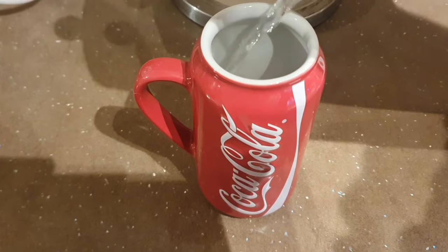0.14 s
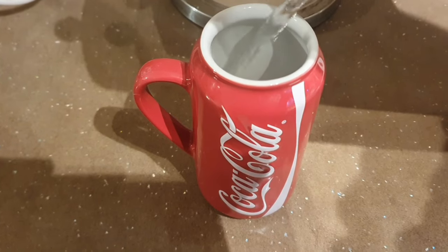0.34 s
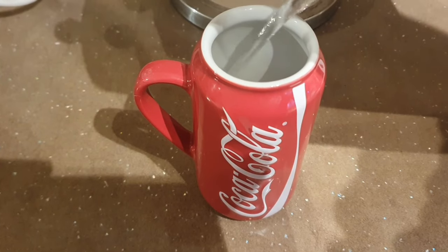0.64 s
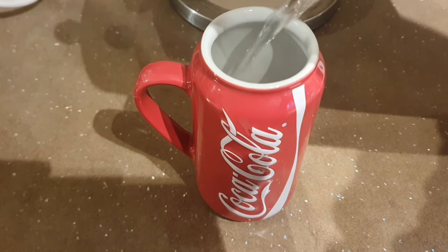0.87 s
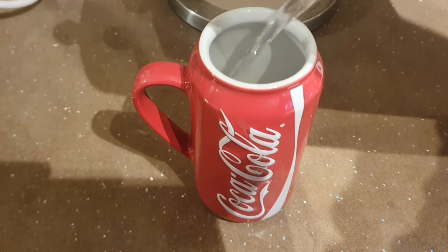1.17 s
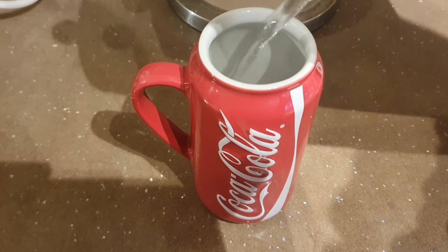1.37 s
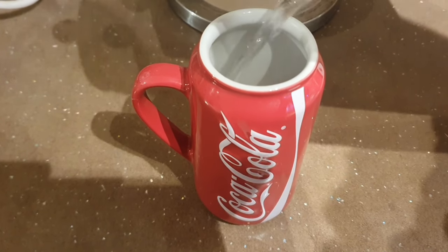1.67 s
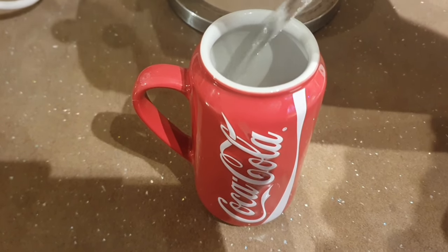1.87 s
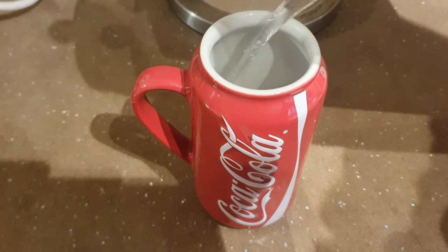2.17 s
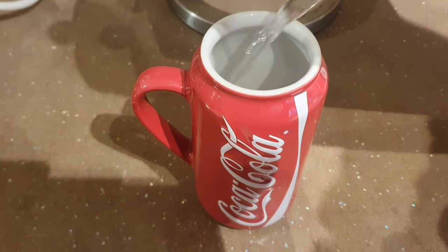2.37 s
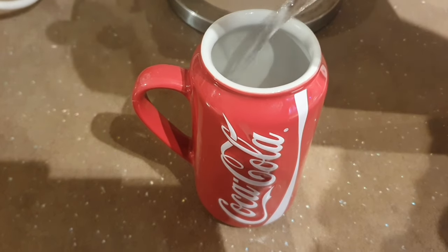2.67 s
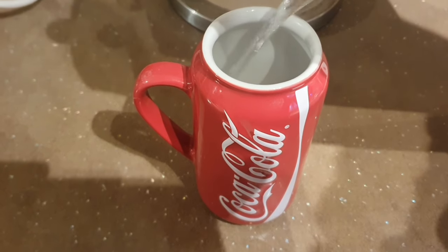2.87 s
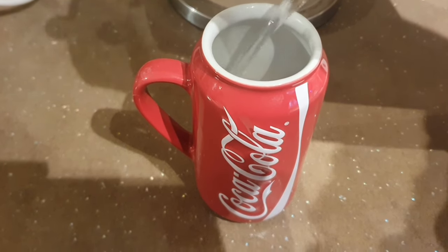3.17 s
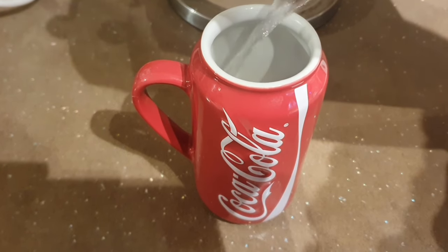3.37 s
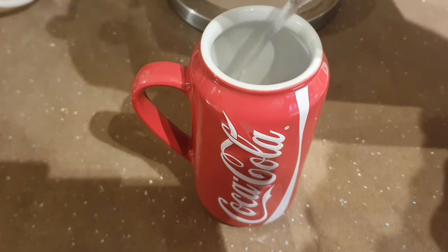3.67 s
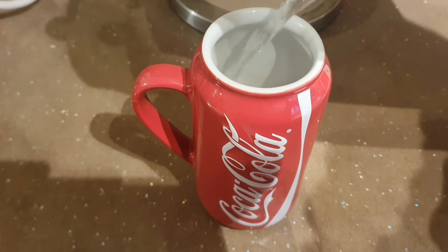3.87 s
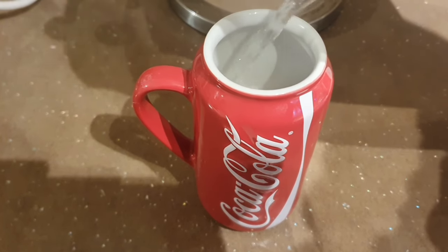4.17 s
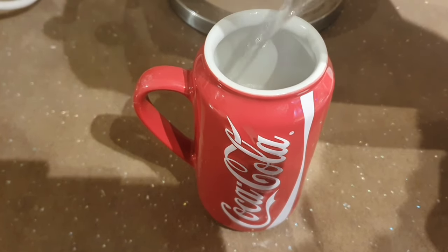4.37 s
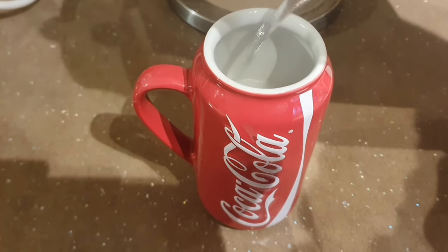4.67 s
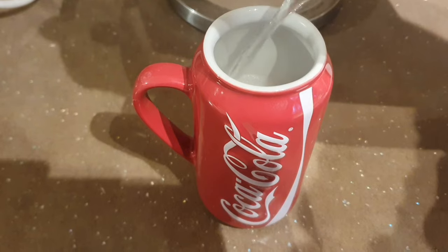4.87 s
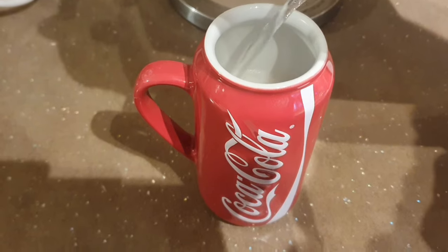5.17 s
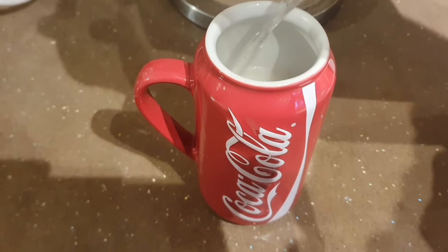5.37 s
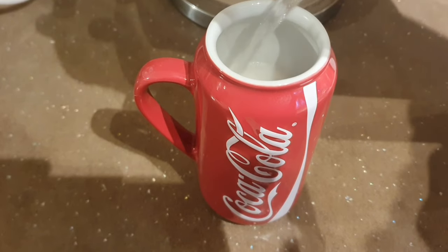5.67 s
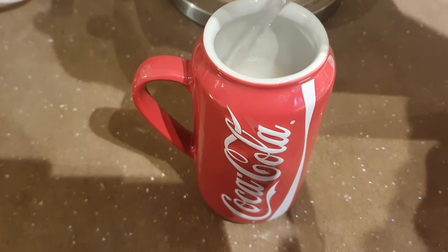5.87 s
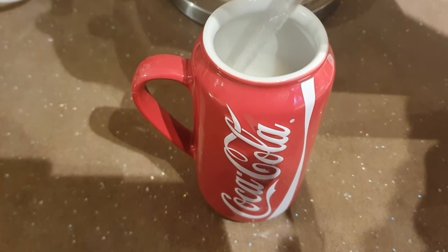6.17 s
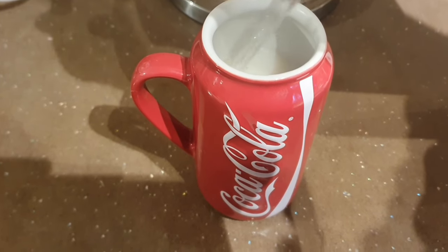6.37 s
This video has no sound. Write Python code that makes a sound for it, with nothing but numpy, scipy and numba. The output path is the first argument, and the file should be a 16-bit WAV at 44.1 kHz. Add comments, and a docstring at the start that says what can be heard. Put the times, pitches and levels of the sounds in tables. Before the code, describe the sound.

A thin stream of hot water pours into a tall ceramic mug without stopping. Bubbles plop and ring hollowly, with sharp ticks and small splats of droplets on glaze. The pouring eases in the middle, then grows dense and bubbly while the hollow pitch climbs. A close phone microphone in a small kitchen catches short echoes, low steady hum and soft air noise.

```python
"""A stream of hot water gurgles, plops and ticks into a tall ceramic mug, over a steady motor hum.
The water traps bubbles, each a short dying tone; they ring the air column above the water,
and its pitch climbs as the mug fills. Droplets add noisy ticks and splats on glaze and water.
A phone hears it from close by in a small kitchen, with short echoes, appliance and mains hum,
and soft air noise."""
import sys
import numpy as np
from scipy import signal
from scipy.fft import rfft, irfft
from scipy.io import wavfile
from numba import njit

SR = 44100
rng = np.random.default_rng(int(sys.argv[2]) if len(sys.argv) > 2 else 0)


def wav_record(signal):
    """Record a signal, one row per channel, as 16-bit PCM in the file named by sys.argv[1]."""
    frames = np.transpose(np.atleast_2d(signal))
    bounded = np.clip(frames, -1, 1)
    # unit amplitude maps onto the largest positive 16-bit level
    quanta = np.round(bounded * 32767).astype(np.int16)
    wavfile.write(sys.argv[1], SR, quanta)


N = 287973


def undb(db):
    """Turn decibels into a gain."""
    return 10 ** (np.asarray(db) / 20)


def unit(x):
    """Scale a sound to an rms (average strength) of 1."""
    return x / np.sqrt(np.mean(x ** 2))


def curves(table):
    """Draw each column of a timed table as a line, sample by sample."""
    s, *columns = np.transpose(table)
    return [np.interp(np.arange(N) / SR, s, column) for column in columns]


def pan(db):
    """Left and right gains for a level difference, left minus right."""
    return undb(np.array([[db], [-db]]) / 2)


def add(out, s, sound):
    """Mix a short sound in at time s, in seconds."""
    i = min(max(int(s * SR), 0), N)
    out[..., i:i + sound.shape[-1]] += sound[..., :N - i]


def convolve(x, response):
    """Filter one or two channels with a response."""
    return signal.fftconvolve(np.atleast_2d(x), np.atleast_2d(response), axes=1)[:, :N]


def high_pass(x, order, hz):
    """Take away what lies below a pitch."""
    return signal.sosfilt(signal.butter(order, hz, "high", fs=SR, output="sos"), x)


def colour(x, points, size=1024):
    """Shape the spectrum through (pitch_hz, level_db) points, by a filter of unit energy."""
    hz, db = np.transpose(points)
    grid = np.maximum(np.arange(size // 2 + 1) * SR / size, 1)
    level_db = np.interp(np.log(grid), np.log(hz), db)
    # folding the cepstrum makes the filter respond only after its input
    cepstrum = irfft(np.log(undb(level_db)))
    cepstrum[1:size // 2] *= 2
    cepstrum[size // 2 + 1:] = 0
    response = irfft(np.exp(rfft(cepstrum)))
    return convolve(x, response / np.linalg.norm(response))


def walk(rate):
    """Wander at random between normal draws, with this many new draws per second."""
    knots = rng.standard_normal(N // 100)
    return np.interp(np.arange(N) / SR * rate, np.arange(len(knots)), knots)


def fade(t60, size):
    """Die away by 60 dB in t60 seconds."""
    return np.exp(-np.log(1000) * np.arange(size) / SR / t60)


def burst(t60, size=2048):
    """Dying noise with unit energy in each of two channels."""
    x = rng.standard_normal((2, size)) * fade(t60, size)
    return x / np.linalg.norm(x, axis=1, keepdims=True)


@njit
def resonate(x, hz, width):
    """Band-pass with a moving centre and width, both in Hz; gain 1 at the centre."""
    y, band, low = np.empty(len(x)), 0., 0.
    for i in range(len(x)):
        g, k = np.tan(np.pi * hz[i] / SR), width[i] / hz[i]
        v = (band + g * (x[i] - low)) / (1 + g * (g + k))
        band, low, y[i] = 2 * v - band, low + 2 * g * v, k * v
    return y


def bubble(hz, cycles, rise=0.066, size=2048):
    """A sine that dies within some cycles, its pitch rising as the bubble nears the surface."""
    age = np.arange(size) * hz / SR  # in cycles
    phase = age * (1 + rise * np.minimum(age / cycles, 1))
    return np.sin(2 * np.pi * phase) * fade(cycles / hz, size)


def patter(spread_db, count):
    """Random impacts of rms 1: many weak ones, a few strong."""
    when, size, sign = rng.random((count, 3)).T
    out = np.zeros(N)
    strength = undb(-spread_db * np.log(size + .015))
    np.add.at(out, (when * N).astype(int), np.sign(sign - .5) * strength)
    return unit(out)


# Air noise of the kitchen, shape of its spectrum: pitch_hz, level_db (relative, per Hz)
AIR_COLOUR = [(20, -9), (45, -6.5), (80, 4.5), (120, 9), (215, -5), (340, 2), (480, -9.5), (700, -9.5),
              (1000, -17.5), (2000, -20.5), (4000, -29.5), (7000, -39), (15000, -41.5)]


def air():
    """Steady room noise, alike left and right in the bass and louder on the right."""
    mid, side = colour(rng.standard_normal((2, N)), AIR_COLOUR, size=8192)
    side = high_pass(side, 1, 650)
    return undb(-46.5) * (mid + side * np.array([[1], [-1]])) * pan(-6.0)


# Steady tones of motor and mains: pitch_hz, level_db (rms, before wavering and panning)
HUM_TONES = [(50, -47), (100, -31.5), (120, -64), (150, -65.5), (160.1, -46.5), (200, -48.5), (250, -58.5),
             (300, -55), (320.2, -47.5), (350, -69), (400, -55.5), (450, -66.5), (500, -60), (550, -74),
             (640.4, -69.5)]
# Standing waves in the room place each tone: left_minus_right_db, left_lead_rad
HUM_PLACES = [(-1.5, -.13), (-3.2, -.43), (-3, -.5), (-3, -.7), (-2.4, -.84), (-5.9, -1.18), (-2.7, -.49),
              (-4.2, -.23), (-3.4, -.42), (-3, -.6), (-2.5, -.93), (-3, -.9), (-7, -2.4), (-3, -.9),
              (-3, -.9)]


def hum():
    """Mains and motor hum as a stack of sines; the upper ones waver more."""
    t, out = np.arange(N) / SR, 0
    for (hz, db), (pan_db, lead) in zip(HUM_TONES, HUM_PLACES):
        phase = 2 * np.pi * (hz * t + rng.random()) + 0.00007 * hz * walk(2.4)
        ports = np.array([[lead], [-lead]]) / 2
        level = np.sqrt(2) * undb(db + 0.00058 * hz * walk(1.5))  # root 2 turns rms into peak
        out = out + level * pan(pan_db) * np.sin(phase + ports)
    return out


def kitchen(x):
    """Early reflections from worktop and kettle, then a short dull tail, stronger on the right."""
    early = undb(-7.5) * burst(0.018, size=16384)
    tail = undb(-9.0) * burst(0.15, size=16384)
    lag = int(.004 * SR)  # 4 ms before the first reflection
    wet = convolve(x, np.pad(early + tail, ((0, 0), (lag, 0))))
    return signal.sosfilt(signal.butter(2, 6500, fs=SR, output="sos"), wet) * pan(-2.5)


def microphones(x):
    """Sound reaches the left port first; treble scattered by the rim arrives in opposite phase."""
    direct = np.array([x, np.roll(x, 3)])  # right port 3 samples later
    treble = high_pass(x, 2, 2600)
    # noise with every pitch made equally strong, then faded
    spectrum = rfft(burst(0.018)[0])
    scatter = irfft(spectrum / np.abs(spectrum)) * fade(0.11, size=2048)
    return direct * pan(0.32) + undb(-10.5) * convolve(treble, scatter) * np.array([[1], [-1]])


def surface_echo(x, column_hz, share=0.15):
    """Ticks bounce once, upside down, between rim and water; the echo comes sooner as the mug fills."""
    n = np.arange(N)
    lag = SR / (2 * column_hz + 250)  # in samples
    return x - share * np.array([np.interp(n - lag, n, channel) for channel in x])


def tick(hz):
    """A sharp crack, a tiny bubble's ping and a rattle of reflections between the mug's walls."""
    ping = bubble(hz, cycles=210)
    return burst(0.00046) + undb(-7.0) * ping / np.linalg.norm(ping) + undb(1) * burst(0.03)


# The sharpest droplets: start_s, tick_level_db, splat_level_db (both before the gains below),
# ping_hz (start pitch)
DROPLETS = [(0.0517, -35, -58, 11400), (0.0897, -31.5, -47, 11500), (0.1186, -22, -47, 10300),
            (0.1456, -16, -45.5, 11900), (0.343, -30.5, -76, 10000), (0.367, -38, -58, 13500),
            (0.4, -31.5, -50.5, 10100), (0.425, -43, -45.5, 8500), (0.4412, -37, -45.5, 8650),
            (0.4756, -25, -49, 9500), (0.502, -30, -54, 11300), (0.545, -25.5, -67, 10300),
            (0.5638, -29, -49, 10200), (0.576, -23.5, -52.5, 10200), (0.69, -32, -71, 13500),
            (0.863, -35, -56, 11000), (0.9134, -20.5, -52, 11700), (0.9724, -31, -57, 13000),
            (1.0242, -29, -63, 12100), (1.1765, -19, -50, 10100), (1.192, -39, -60, 11000),
            (1.382, -29.5, -72, 8260), (1.418, -35, -50, 10300), (1.507, -35, -61, 11600),
            (1.666, -40, -48.5, 9330), (1.6904, -28, -48, 13000), (1.7092, -36, -46, 9900),
            (1.733, -39, -59, 11000), (1.8313, -31.5, -76, 9500), (1.9, -38, -53, 11900),
            (2.0677, -33, -53, 11700), (2.2433, -38.5, -44.5, 8100), (2.263, -52, -52, 9000),
            (2.5726, -33, -51, 11700), (3.053, -34.5, -67, 9900), (3.124, -38, -50, 10900),
            (3.1468, -31, -61, 10000), (3.197, -27, -77, 11800), (3.3426, -26, -42, 8260),
            (3.431, -39, -60, 10500), (3.454, -40, -59, 11100), (3.6342, -31.5, -50, 9400),
            (3.749, -36.5, -65, 9900), (3.813, -36.5, -51.5, 10300), (3.983, -47, -59, 8850),
            (4.1075, -34, -51, 8650), (4.188, -37.5, -52, 10000), (4.245, -35, -55, 9400),
            (4.3266, -32.5, -48.5, 8600), (4.4263, -18.5, -40.5, 8550), (4.4661, -23.5, -56, 8160),
            (4.523, -24.5, -52, 9800), (4.5555, -30, -49, 12100), (4.996, -39, -47.5, 10100),
            (5.08, -33, -54, 9300), (5.0988, -28, -44.5, 10100), (5.168, -32, -52, 9300),
            (5.2816, -29, -59, 11300), (5.298, -30, -53, 7800), (5.33, -23, -41.5, 8800),
            (5.377, -32, -51, 12000), (5.413, -34, -51, 10000), (5.5, -26, -52, 10800),
            (5.619, -34, -47, 11000), (5.635, -34, -48, 11000), (5.7004, -29.5, -50, 11400),
            (5.7458, -19, -44, 11100), (5.764, -30, -47, 8120), (5.8789, -31, -48, 11300),
            (5.913, -40, -49, 9600), (5.9395, -35, -52.5, 10600), (6.107, -37, -61, 10900),
            (6.156, -35, -65, 10200), (6.174, -25.5, -46, 11300), (6.222, -31, -49, 10400),
            (6.2878, -28, -44, 11600), (6.3097, -31.5, -45.5, 8300), (6.387, -40, -61, 11100),
            (6.4057, -27.5, -63, 11500), (6.468, -32, -63, 10800), (6.496, -36, -56, 10500)]
# Tone colour of the ticks: pitch_hz, level_db (relative)
TICK_COLOUR = [(3000, -31), (4600, -14.5), (5700, -13.5), (7100, -14), (8100, -2.5), (8800, -3),
               (9500, -2.5), (11300, -3), (13500, -2.5), (15200, -12), (16500, -5)]
# Tone colour of the splats: pitch_hz, level_db (relative)
SPLAT_COLOUR = [(400, 11), (1000, 8), (1600, 1), (2300, -3), (3400, -0.5), (4400, -1), (5700, 0.5),
                (7000, -0.5), (8500, -9.5), (11000, -5), (15000, -70)]
TICK_GAIN_DB, SPLAT_GAIN_DB = 8, 23
TICK_PAN_DB, TICK_PAN_DB_PER_S = 17, -1.4  # left minus right; moves toward the middle as the water rises


def droplets(splash_db, spray_db):
    """Each droplet gives a bright tick and a duller splat, over fine spray and the stream's rush."""
    ticks, splats = np.zeros((2, N)), np.zeros(N)
    for s, tick_db, splat_db, ping_hz in DROPLETS:
        sides = pan(TICK_PAN_DB + TICK_PAN_DB_PER_S * s)
        pop = bubble(ping_hz, cycles=10.7)
        crack = tick(ping_hz) + undb(-3.0) * pop / np.linalg.norm(pop)
        add(ticks, s, undb(tick_db + TICK_GAIN_DB) * sides / np.linalg.norm(sides) * crack)
        splat = burst(0.0069)[0] + undb(-2.0) * burst(0.084)[0]
        add(splats, s, undb(splat_db + SPLAT_GAIN_DB) * splat)
    # spray comes in clumps of several drop sizes, each with its own ping and reflections
    clumps = undb(spray_db + 2.64 * walk(13))
    for hz in np.geomspace(8200, 14500, 9):
        impacts = clumps * patter(spread_db=6.0, count=190)
        ticks += undb(-10.0) * pan(12.4) * convolve(impacts, tick(hz))
        splats += undb(-9.0) * convolve(impacts, burst(0.017)[0])[0]
    rush = patter(spread_db=5.2, count=1200)
    rush_level = undb(splash_db - 9.5 + 3.1 * walk(13))
    return colour(ticks, TICK_COLOUR), colour(splats + rush_level * rush, SPLAT_COLOUR)[0]


def small_bubbles(centre_hz, octaves, cycles, spread_db, count):
    """A swarm of bubbles of rms 1, their pitches scattered round a moving centre."""
    out = np.zeros(N)
    for when, size, a, b in rng.random((count, 4)):
        hz = centre_hz[int(when * N)] * 2 ** (octaves * (a - b))
        strength = undb(-spread_db * np.log(size + 0.19))
        add(out, when * N / SR, strength * bubble(hz, cycles))
    return unit(out)


# Small bright plips, mostly 2 to 3 kHz, well above the large bubbles: start_s,
# level_db (before the cut below), pitch_hz (each starts 3 % lower and rises)
BRIGHT_PLIPS = [(0.1191, -35.5, 2120), (0.166, -43, 2200), (0.4778, -42, 2300), (0.5764, -39, 2280),
                (0.6509, -39, 2300), (0.6656, -41, 2330), (0.983, -45, 2410), (1.007, -43, 2360),
                (1.5838, -40.5, 2570), (1.71, -40, 2600), (1.7924, -44, 2590), (2.0344, -41, 2800),
                (2.1335, -40, 2650), (2.187, -39, 2680), (2.431, -37, 2880), (2.959, -34.5, 2800),
                (3.297, -37, 2040), (3.4118, -30, 2970), (3.5143, -41, 3120), (4.2187, -37, 2790),
                (6.2198, -27, 1970)]


def plips():
    """Now and then a small, bright bubble rings and stands out."""
    out = np.zeros(N)
    for s, db, hz in BRIGHT_PLIPS:
        add(out, s, undb(db - 3.5) * bubble(hz * 0.97, cycles=17.2, rise=0.063))
    return out


# The loudest large bubbles: start_s, ring_level_db, thump_level_db (of the collapsing crater),
# both before the gains below
LARGE_BUBBLES = [(0.056, -31, -45), (0.089, -29, -60), (0.119, -31, -46), (0.145, -33, -35.5),
                 (0.212, -35, -40.5), (0.28, -39, -46), (0.424, -51, -52), (0.441, -43, -51),
                 (0.506, -33.5, -56), (0.545, -26, -52), (0.563, -36, -45), (0.58, -30.5, -40),
                 (0.629, -30.5, -59), (0.664, -40, -48), (0.756, -33.5, -60), (0.795, -28, -54),
                 (0.847, -26, -50), (1.183, -37, -72), (1.419, -36, -57), (1.623, -22.5, -42),
                 (1.646, -35, -46), (1.683, -24.5, -55), (1.708, -39, -53), (1.731, -28, -52),
                 (1.887, -28.5, -53), (1.921, -32, -53), (2.136, -29.5, -39), (2.358, -38, -50),
                 (2.429, -39, -44), (2.814, -33, -34), (2.952, -25.5, -50), (3.266, -36, -32.5),
                 (3.296, -39, -50), (3.323, -38, -50), (3.388, -30, -42), (3.431, -28.5, -51),
                 (3.462, -47, -46), (3.49, -29, -60), (3.532, -28.5, -49), (3.661, -34, -47),
                 (3.682, -30, -40), (3.696, -37, -45), (3.966, -42, -48), (3.993, -34, -48),
                 (4.032, -36, -49), (4.119, -35, -41.5), (4.151, -48, -45), (4.239, -25.5, -54),
                 (4.359, -36.5, -46), (4.38, -38, -54), (4.416, -57, -46), (4.459, -36, -57),
                 (4.582, -37, -43), (4.632, -32.5, -54), (4.668, -34, -38.5), (4.686, -32.5, -58),
                 (4.765, -31, -56), (4.816, -29, -61), (4.868, -34, -54), (4.97, -37, -50),
                 (4.996, -26.5, -46), (5.033, -37, -42.5), (5.062, -36, -52), (5.081, -26.5, -37.5),
                 (5.101, -33, -51), (5.142, -25, -40), (5.22, -28.5, -60), (5.265, -24.5, -40),
                 (5.279, -38, -48), (5.305, -33, -49), (5.377, -35, -52), (5.414, -37, -47),
                 (5.5, -34, -54), (5.511, -32, -52), (5.566, -35, -54), (5.582, -25, -40),
                 (5.62, -21.5, -49), (5.636, -28, -57), (5.652, -29, -58), (5.665, -30.5, -56),
                 (5.702, -25, -57), (5.729, -25.5, -35), (5.746, -26, -58), (5.764, -22, -61),
                 (5.804, -27, -48), (5.852, -38, -59), (5.863, -30.5, -59), (5.879, -32.5, -52),
                 (5.94, -27, -46), (5.987, -34, -47), (6.001, -36, -44), (6.034, -26.5, -54),
                 (6.054, -37, -56), (6.07, -35, -57), (6.086, -25, -48), (6.107, -25, -48),
                 (6.134, -28, -55), (6.157, -37, -59), (6.174, -20, -33), (6.206, -39, -44),
                 (6.22, -21.5, -62), (6.236, -33, -45), (6.266, -29, -50), (6.289, -22, -50),
                 (6.313, -23.5, -43), (6.337, -25, -44), (6.35, -25, -43), (6.368, -34, -54),
                 (6.388, -29, -59), (6.403, -23.5, -71), (6.43, -24, -58), (6.449, -19, -58),
                 (6.501, -29.5, -56), (6.522, -27, -51)]
BUBBLE_RATIO, BUBBLE_SCATTER = 0.97, 0.089  # start pitch over the column's first mode; spread as a share
THUMP_HZ, SLAP_HZ = 543, 1087  # two tones of a collapsing crater, before scatter
RISE, RISE_PER_S = 0.022, 0.011  # upward chirp, growing as the mug fills


def large_bubbles(column_hz):
    """A crater shuts with a slap and low thump, pinching off a bubble near the column's pitch."""
    out = np.zeros(N)
    chances = rng.uniform(-1, 1, (len(LARGE_BUBBLES), 5))
    for (s, db, thump_db), chance in zip(LARGE_BUBBLES, chances):
        hz = column_hz[int(s * SR)] * BUBBLE_RATIO * (1 + BUBBLE_SCATTER * chance[2])
        ring = bubble(hz, cycles=9.3 * (1 + 0.42 * chance[4]), rise=RISE + RISE_PER_S * s)
        # just under the surface a bubble radiates little below its own pitch
        add(out, s, undb(db + 0.5) * high_pass(ring, 2, 0.6 * hz))
        # a smaller, higher companion breaks off with it
        companion = bubble(hz * (1.276 + 0.22 * chance[1]), cycles=7.6, rise=0.11)
        add(out, s + 0.00081 * (1 + chance[0]), undb(db - 6.5) * companion)
        # the crater's thump, slap and sharp crack
        thump = bubble(THUMP_HZ * (1 + 0.12 * chance[0]), cycles=7.1)
        slap = bubble(SLAP_HZ * (1 + 0.046 * chance[3]), cycles=14.0)
        add(out, s, undb(thump_db + 9.0) * thump)
        add(out, s, undb(thump_db + 10.0) * slap)
        add(out, s, undb(thump_db + 12.0) * bubble(3300, cycles=0.9))
    return out


# First mode of the air column, climbing as the mug fills: time_s, pitch_hz
COLUMN_CLIMB = [(0, 641), (0.55, 680), (0.85, 704), (1.7, 746), (2.15, 777), (2.9, 826), (3.35, 860),
                (3.7, 883), (4.25, 1010), (5.1, 1098), (5.95, 1163), (6.53, 1340)]
# Modes of the column: start_hz, climb_power (of the first mode's climb), start_width_hz,
# gain_db (at the start, relative), gain_change_db_per_s
MODES = [(641, 1.0, 29.2, 9.5, -0.63), (2203, 1.18, 198, 13, -1.7), (4180, 0.64, 330, 10, -1.2),
         (5330, 1.1, 290, 15, -8.5)]


def column_pitches():
    """All modes climb as the air column shortens, each by its own power of the first mode's climb."""
    first_hz, = curves(COLUMN_CLIMB)
    climb = first_hz / first_hz[0]
    return [start_hz * climb ** power for start_hz, power, *_ in MODES]


def mug(water):
    """The air column rings with the water's noises; its modes climb, widen and fade as it shortens."""
    t, pitches = np.arange(N) / SR, column_pitches()
    # a shallower column leaks more sound, so its modes widen
    leak = (pitches[0] / pitches[0][0]) ** 2.69
    out = 0
    for hz, (_, _, width, db, db_per_s) in zip(pitches, MODES):
        out = out + undb(db + db_per_s * t) * resonate(water, hz, width * leak)
    return out


# The stream breaking on the surface: time_s, spray_level_db, splash_level_db, gurgle_level_db
# (all before each layer's own gain)
STREAM = [(0.0, -63, -66, -51.5), (0.73, -62, -63, -48.5), (1.0, -65, -63, -51.5), (1.51, -64, -65, -56.5),
          (1.82, -64.5, -60.5, -51.5), (2.47, -73, -69, -58), (2.95, -69.5, -67, -51.5),
          (3.27, -65, -60.5, -50.5), (3.51, -67.5, -61, -44.5), (3.91, -71.5, -58.5, -47.5),
          (4.53, -64, -61.5, -53), (4.95, -69.5, -58.5, -46.5), (5.2, -64, -69, -43),
          (5.38, -67, -62, -52.5), (6.02, -61, -60.5, -44), (6.24, -61.5, -57, -37.5),
          (6.53, -67.5, -75, -48)]


def scene():
    """Bubbles and droplets inside the mug, the kitchen round it."""
    spray_db, splash_db, gurgle_db = curves(STREAM)
    column_hz, *_ = column_pitches()
    ticks, splats = droplets(splash_db, spray_db)
    gurgle = small_bubbles(1.13 * column_hz, octaves=.7, cycles=10, spread_db=4, count=900)
    plops = small_bubbles(1.06 * column_hz, octaves=.3, cycles=9, spread_db=2.5, count=150)
    fizz = small_bubbles(np.full(N, 2800), octaves=1.1, cycles=11, spread_db=8, count=650)
    swarm = undb(gurgle_db - 15.0) * (gurgle + plops) + undb(splash_db - 6.0) * fizz
    water = undb(-4.0) * large_bubbles(column_hz) + plips() + swarm + splats
    in_mug = undb(0.5) * water + undb(1.5) * mug(water)
    near = microphones(in_mug) + surface_echo(ticks, column_hz)
    return near + kitchen(near.mean(axis=0)) + hum() + air()


def record(dry):
    """The phone cuts the top, steeply above 15900 Hz."""
    return signal.sosfilt(signal.ellip(8, .2, 70, 15900, fs=SR, output="sos"), dry)


dry = scene()
out = record(dry)
wav_record(out)
```